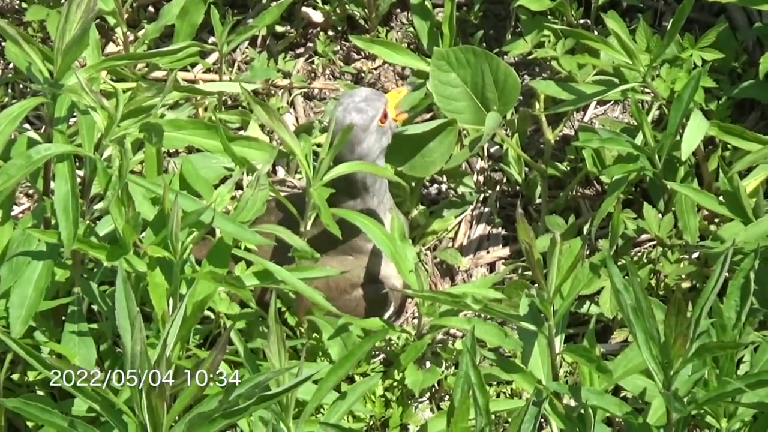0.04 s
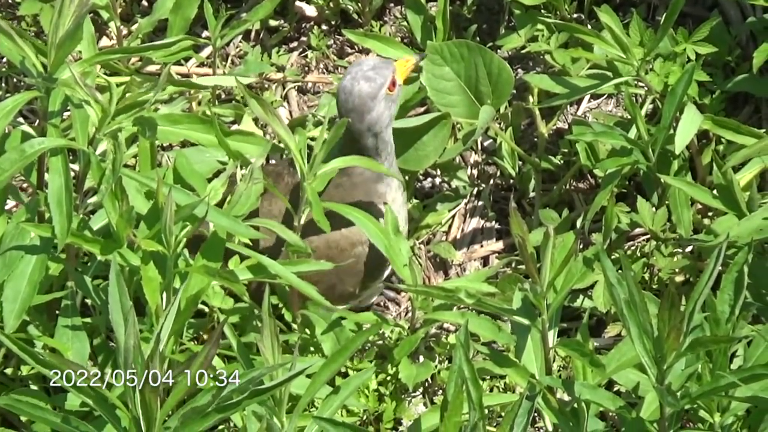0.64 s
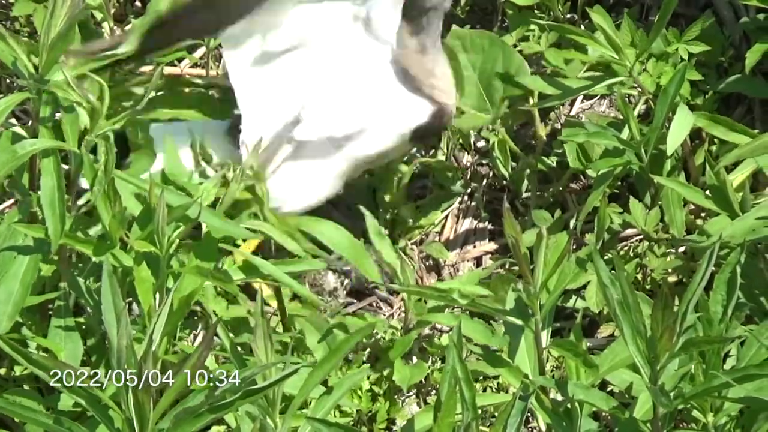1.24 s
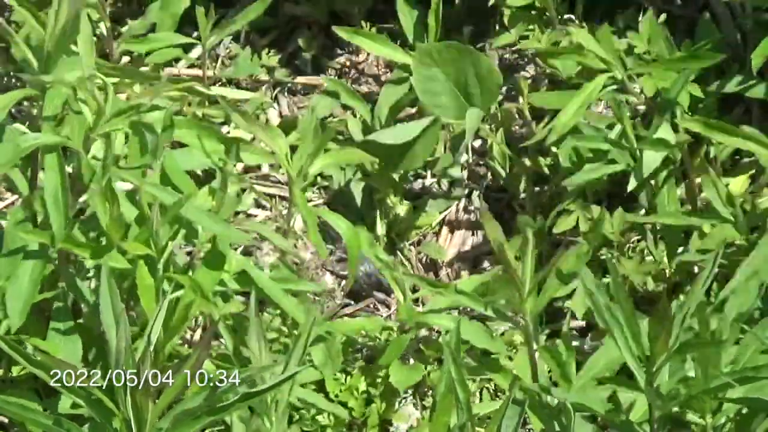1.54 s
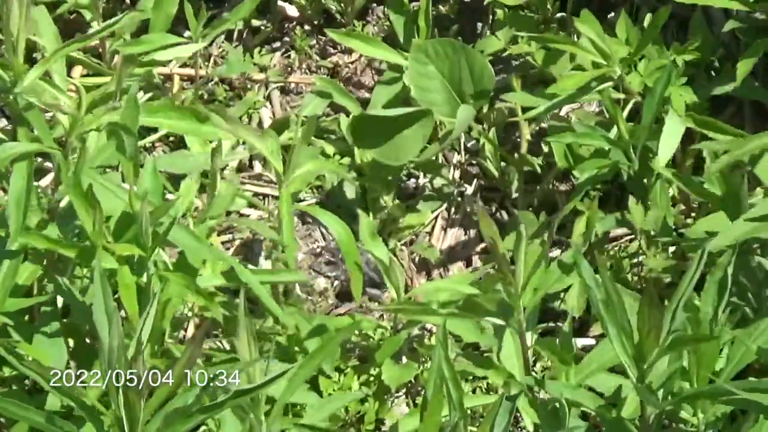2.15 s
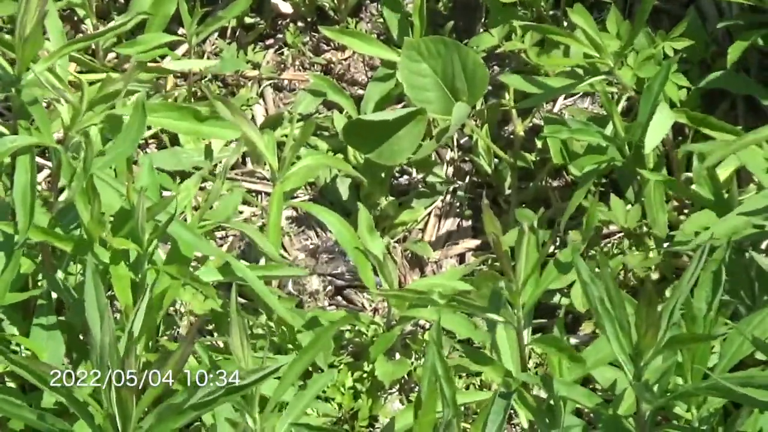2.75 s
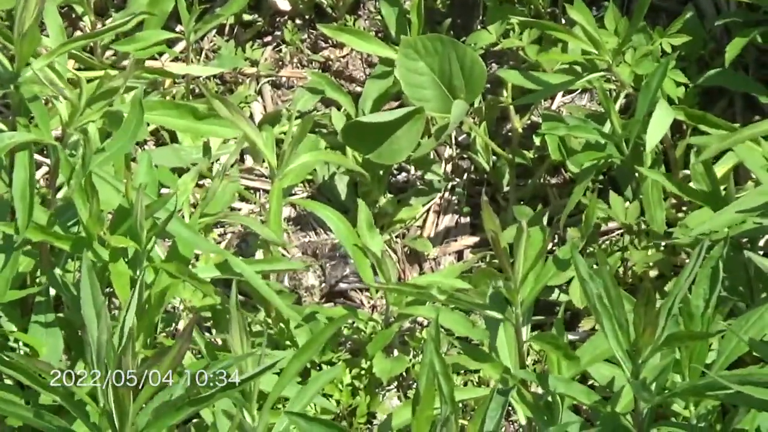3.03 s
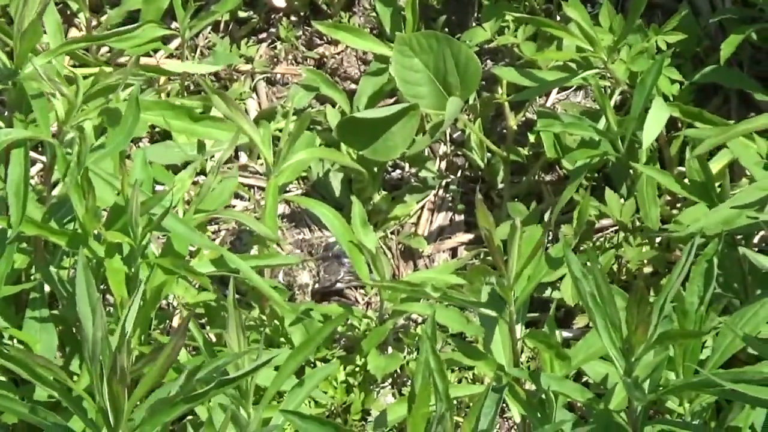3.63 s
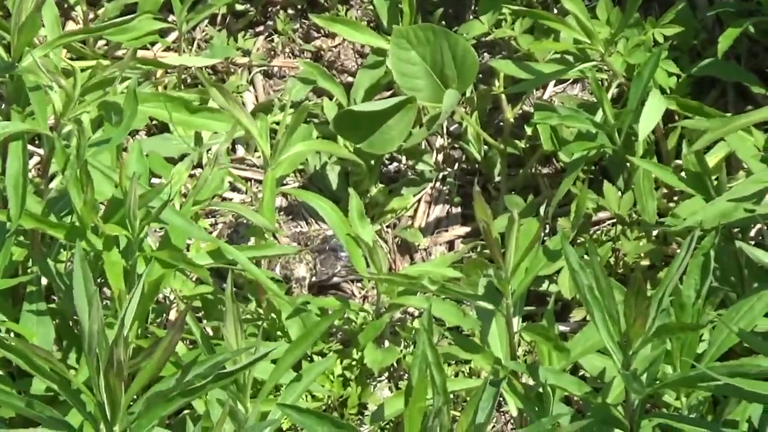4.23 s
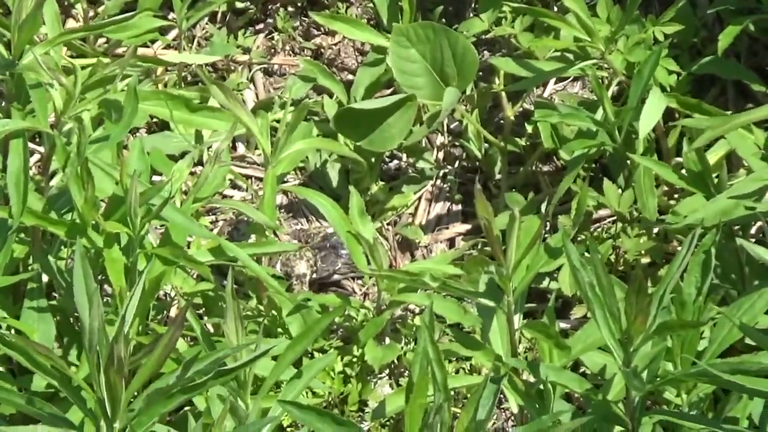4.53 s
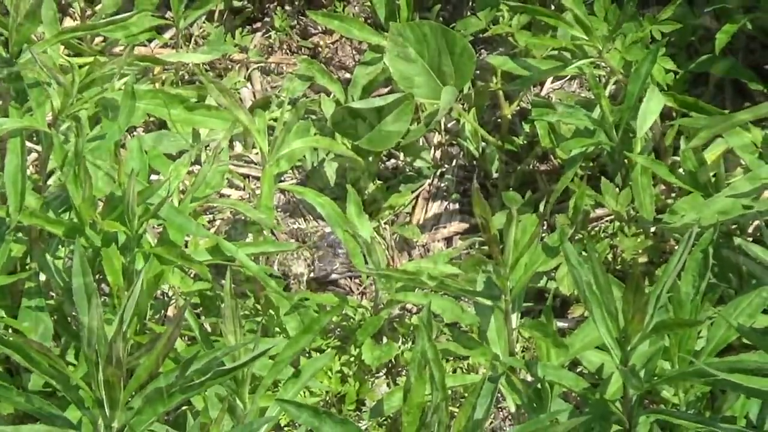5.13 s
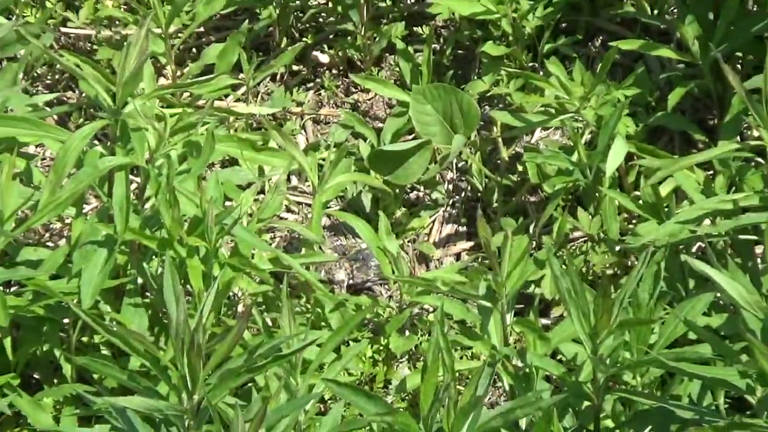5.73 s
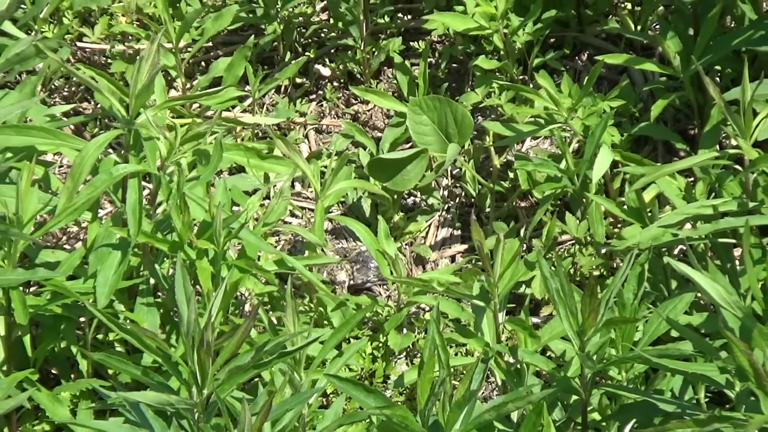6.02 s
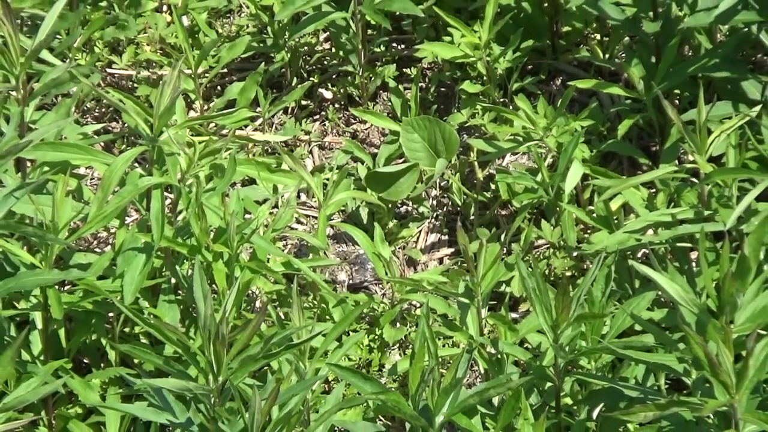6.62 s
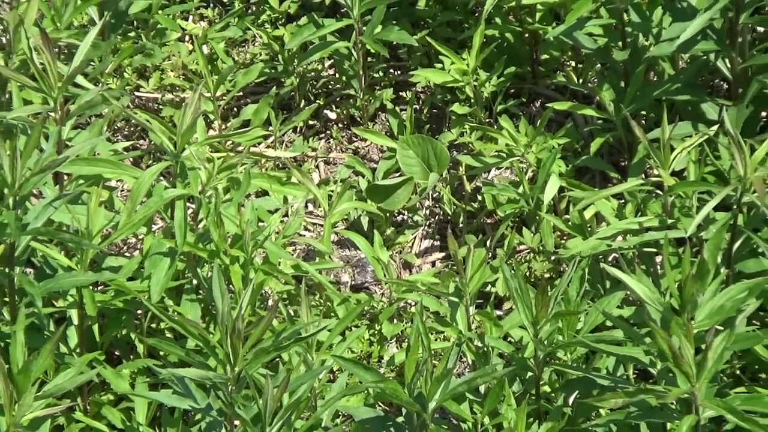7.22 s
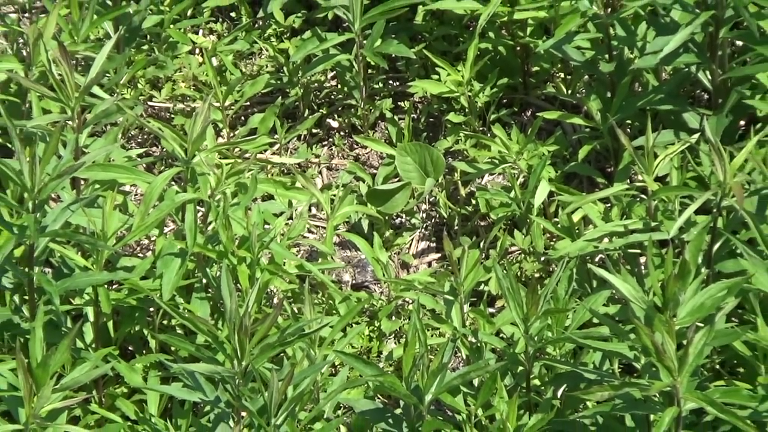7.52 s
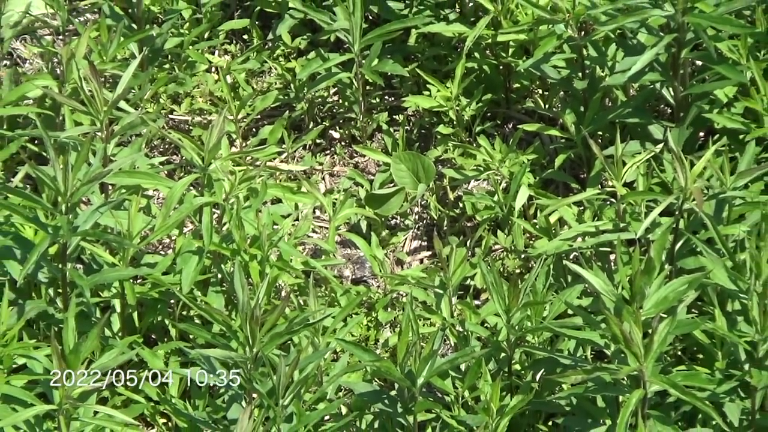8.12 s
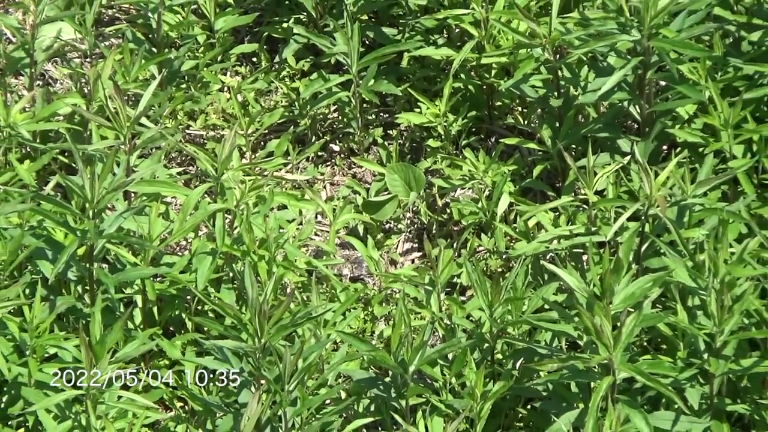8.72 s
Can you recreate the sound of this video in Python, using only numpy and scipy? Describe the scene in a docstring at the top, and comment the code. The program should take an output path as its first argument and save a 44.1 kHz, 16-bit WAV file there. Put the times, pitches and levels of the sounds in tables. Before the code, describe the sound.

A lapwing gives sharp, reedy scolding calls, flies off in a fast fading run, then calls close again over a low outdoor rumble.

```python
"""Sharp, reedy scolds from a lapwing on its nest in the weeds, over a low outdoor rumble. Leaves crackle
as it takes off; it flies away in a fast run of calls that flip between a low and a high register, then
five sharp calls come from close by, with faint chirps of small birds far off. Each note is a pulse train
from the syrinx ringing through windpipe and beak, and the field scatters it back.
A limiter flattens the loudest calls."""
import sys
import numpy as np
from scipy import signal
from scipy.fft import rfft, irfft, next_fast_len
from scipy.io import wavfile
from scipy.ndimage import uniform_filter1d, minimum_filter1d

SR = 44100
rng = np.random.default_rng(int(sys.argv[2]) if len(sys.argv) > 2 else 0)


def master(y):
    """Save y as 16-bit WAV."""
    cut = np.clip(np.atleast_2d(y).T, -1, 1)
    pcm = np.round(cut * 32767)  # scale
    wavfile.write(sys.argv[1], SR, pcm.astype(np.int16))


N = 390726
TIME = np.arange(N) / SR

# the fast run in flight: t/s, length/s, level/dB, opening pitch/Hz, time to the register flip/s (0: none)
FLIGHT_CALLS = [(2.447, .055, -21.5, 1460, 0), (2.541, .077, -24.5, 1620, .025),
                (2.648, .087, -25, 1620, .022), (2.772, .076, -24.5, 1645, .024),
                (2.907, .085, -24.5, 1482, 0), (3.05, .083, -27, 1652, 0), (3.19, .078, -29, 1630, .03),
                (3.318, .07, -29, 1492, .029), (3.448, .069, -29.5, 1505, .024),
                (3.57, .075, -28.5, 1497, 0), (3.702, .075, -30.5, 1503, 0), (3.843, .071, -29.5, 1495, 0),
                (3.978, .07, -32, 1503, .045), (4.117, .085, -36, 1597, 0), (4.25, .095, -37.5, 1630, .046),
                (4.391, .083, -36.5, 1622, 0), (4.527, .072, -37, 1634, 0), (4.654, .074, -35, 1478, 0),
                (4.766, .115, -37, 1620, .048), (4.932, .056, -40, 1470, 0), (4.996, .041, -46, 1530, 0),
                (5.099, .072, -51.5, 1660, .047), (5.26, .043, -63, 1502, 0)]


def from_db(db):
    """Decibels to gain."""
    return 10 ** (np.asarray(db) / 20)


def unit(x):
    """Scales to rms 1."""
    return x / np.sqrt(np.mean(x ** 2) + 1e-20)


def bell(hz, centre_hz, width_hz):
    """A bell curve of height 1."""
    return np.exp(-.5 * ((hz - centre_hz) / width_hz) ** 2)


def over_hz(points, hz):
    """Reads an EQ curve on a log-frequency axis."""
    f, value = np.transpose(points)
    return np.interp(np.log(hz + 1), np.log(f), value)


def over_time(rows, t):
    """Reads every lane of an automation curve at the times t."""
    s, *lanes = np.transpose(rows)
    return [np.interp(t, s, lane) for lane in lanes]


def add(mix, s, sound):
    """Mixes a sound in at s seconds."""
    start = round(s * SR)
    sound = sound[max(-start, 0):]
    part = mix[max(start, 0):][:len(sound)]
    part += sound[:len(part)]


def pan(x, pan_db):
    """Mono to stereo by a level difference, left minus right."""
    return np.array([x * from_db(pan_db / 2), x * from_db(-pan_db / 2)])


def flutter(n, centre_hz, width_hz, size=16384):
    """Random modulation in a band of rates, rms about 1."""
    band = bell(np.fft.rfftfreq(size, 1 / SR), centre_hz, width_hz)
    return unit(irfft(rfft(rng.standard_normal(size)) * band))[:n]


def arch(u, start, middle, end):
    """A parabola through three pitches as u runs from 0 to 1."""
    return np.polyval(np.polyfit([0, .5, 1], [start, middle, end], 2), u)


def scatter(x, delay_s, t60, treble_t60):
    """Sparse echoes of random sign from plants and ground; the treble has its own decay time."""
    t = np.arange(SR) / SR
    taps = rng.choice([-1., 1.], SR) * (rng.random(SR) < 2500 / SR) * (t > delay_s)
    hz, s, spectrum = signal.stft(taps, SR, nperseg=256)
    decay_s = over_hz([(3500, t60), (12000, treble_t60)], hz)[:, None]
    tail = signal.istft(spectrum * from_db(-60 * s / decay_s), SR, nperseg=256)[1]
    return signal.fftconvolve(x, tail / np.linalg.norm(tail))[:N]


def traffic_and_air(level_db=-48.7, patchy_db=1.8):
    """Far traffic and moving air: a rumble and a soft roar that swell together in drifting patches."""
    # tone of the bed: f/Hz, relative level/dB
    bed_eq = [(15, -51), (25, -11), (59, -15), (99, -7), (250, -2.6), (420, -13), (600, -15.5),
              (911, -17.3), (1040, -10), (1290, -14), (1520, -15.5), (2280, -28), (3160, -31),
              (3520, -35.5), (4370, -36), (16000, -42)]
    # its rise and fall: t/s, relative level/dB
    swell = [(0, -1), (.6, -3), (1.2, 0), (2.2, -4), (3.2, 0), (4, 1), (4.7, 5.5), (5.2, 6), (5.45, .5),
             (5.75, 5), (5.95, -1), (6.6, -3), (7.5, -1), (8.86, .5)]
    # how far each band follows the swell: f/Hz, factor
    swell_depth = [(60, .8), (300, 1), (800, 1.15), (2000, 1), (7000, .75)]
    # stereo balance: f/Hz, pan/dB
    balance = [(40, 0), (240, -1.8), (900, -3), (3800, -1.5), (15000, 0)]
    # stereo width: f/Hz, side against mid/dB
    width = [(30, -28), (120, -22), (500, -18), (3000, -18), (8000, -20), (13000, -28)]
    frames, hz = N // 512 + 5, np.fft.rfftfreq(2048, 1 / SR)
    mid_re, mid_im, side_re, side_im, patches = rng.standard_normal((5, frames, len(hz)))
    patches = unit(uniform_filter1d(uniform_filter1d(patches, 12, 0), 10, 1))
    swell_db, = over_time(swell, np.arange(frames) * 512 / SR)
    db = over_hz(bed_eq, hz) + patchy_db * patches
    db += np.outer(swell_db - swell_db.mean(), over_hz(swell_depth, hz))
    mid = pan(mid_re + 1j * mid_im, over_hz(balance, hz))
    side = from_db(over_hz(width, hz)) * (side_re + 1j * side_im)
    spectrum = (mid + np.array([side, -side])) * from_db(db)
    bed = signal.istft(spectrum, nperseg=2048, noverlap=1536, time_axis=1, freq_axis=2)[1]
    return from_db(level_db) * unit(bed[:, :N])


def small_birds():
    """Soft rising whistles far off, with a short echo."""
    # sine glides: t/s, length/s, level/dB, start f/Hz, middle f/Hz, end f/Hz
    chirps = [(6.063, 0.052, -52.5, 1680, 1960, 2130), (6.374, 0.041, -59.5, 2500, 2700, 2720),
              (7.82, 0.1, -77, 3500, 4050, 4250), (8.644, .11, -72.5, 3500, 4040, 4100)]
    out = np.zeros(N)
    for s, length, db, *pitches in chirps:
        u = np.linspace(0, 1, round(length * SR))
        whistle = np.sin(2 * np.pi * np.cumsum(arch(u, *pitches)) / SR)
        add(out, s, from_db(db) * unit(np.sin(np.pi * u) * whistle))
    return pan(out + from_db(-7) * scatter(out, delay_s=.01, t60=.4, treble_t60=.33), -1.5)


def leaves():
    """Wings and feet brush the leaves: bursts of fine, bright crackle."""
    # brushes: t/s, length/s, level before the band-pass/dB
    rustles = [(1.268, 0.14, -56), (1.398, 0.023, -45.5), (1.407, 0.0086, -38), (1.412, 0.052, -44),
               (1.517, .008, -34), (7.62, 0.045, -69)]
    out = np.zeros(N)
    for s, length, db in rustles:
        n = round(length * SR)
        grains = rng.standard_normal(n) * from_db(7 * rng.standard_normal(n))
        add(out, s, from_db(db) * unit(grains * np.hanning(n)))
    bright = signal.butter(1, [3000, 13000], "band", fs=SR, output="sos")
    return pan(signal.sosfilt(bright, out), 0)


def syrinx(cycles, pressure, wander=.41, wander_hz=20, sharpening=.27, harmonics=14):
    """Pulses that sharpen with pressure; the moving head makes every harmonic wander on its own."""
    n, out = len(cycles), 0
    for k in range(1, harmonics + 1):
        path = 1 + wander * (flutter(n, 0, wander_hz) + 1j * flutter(n, 0, wander_hz))
        out = out + pressure ** (sharpening * k) * (path * np.exp(2j * np.pi * k * cycles)).real
    return unit(out)


def throat(x, tilt_db, low_db, peak_hz, peak_db, dip_hz, dip_db, size=8192):
    """Windpipe and open beak ring after every pulse, coloured by the bird's posture."""
    # their resonances: f/Hz, level/dB
    formants = [(600, -53.5), (1200, -18.5), (1600, -15.5), (2400, -13.2), (3000, -3), (3500, -2),
                (4400, -4), (5900, 0.2), (7300, -8), (8500, -9), (9600, -8.5), (11000, -16), (13000, -21),
                (15300, -25.5)]
    hz = abs(np.fft.fftfreq(size, 1 / SR))
    db = over_hz(formants, hz) + tilt_db * np.log2(np.maximum(hz / 3860, 1))  # treble tilt per octave
    db += low_db * bell(hz, 3056, width_hz=247)  # the low resonance
    db += peak_db * bell(hz, peak_hz, width_hz=650) + dip_db * bell(hz, dip_hz, width_hz=650)
    minimum_phase = np.exp(np.conj(signal.hilbert(np.log(from_db(db)))))
    return np.fft.ifft(np.fft.fft(x, size) * minimum_phase).real[:len(x)]


def note(s, length, db, pitches, rough, tilt_db, low_db, attack_s, lead_db, doubling,
         rasp=.19, scoop=.2, lead_s=.011, release_s=.0089, fade_db=11, shimmer_db=4.5):
    """A soft upward yip bursts into an arch of pitch; as the pressure drops it sags, rasps and stops."""
    # the voice when crouched, stretched up, taking off, climbing, flying away, close by, passing:
    # from t/s, closing sag/share of pitch, tilt/dB per octave, peak f/Hz, peak/dB, dip f/Hz, dip/dB
    postures = [(-1, .03, 2.3, 3550, 4, 4800, -6), (.7, .025, .9, 9400, 2, 2200, -3),
                (1.4, .025, 1.9, 9300, 5.5, 2300, -4.5), (2.15, .05, -2.5, 4600, 3, 3000, -9),
                (2.4, .018, -4, 10900, 7, 8770, -4.5), (5.7, .075, 4.3, 4700, 4, 2700, -4),
                (7, .1, 3.3, 7380, 9, 3900, -3.5)]
    sag, posture_tilt_db, *colour = [row[1:] for row in postures if row[0] <= s][-1]
    t = np.arange(-lead_s, length + .003, 1 / SR)
    n, u = len(t), np.clip(t / length, 0, 1)
    opening, closing = np.exp(-(t - t[0]) / (lead_s / 2)), u ** 6
    rough = rough + .5 * closing + .6 * opening
    hz = arch(u, *pitches) * (1 - sag * u ** 3.5 - scoop * np.clip(-t / lead_s, 0, 1))
    hz *= 1 + .029 * rough * flutter(n, 250, 200) + .0055 * flutter(n, 40, 50)  # jitter and waver
    cycles = np.cumsum(hz) / SR
    burst = np.clip(t / attack_s + .5, 0, 1)
    lead_in = from_db(lead_db) * np.clip(2 * (t - t[0]) / lead_s, 0, 1)
    release = np.clip((t[-1] - t) / release_s, 0, 1)
    pressure = np.sin(np.pi / 2 * np.maximum(burst, lead_in) * release)
    puffs = unit(np.exp(-(cycles % 1) / .5) * rng.standard_normal(n))  # air escapes once a cycle
    drive = (syrinx(cycles, .5 + pressure / 2) + rasp * rough * puffs) * pressure
    drive *= 1 + doubling * np.sin(np.pi * u) ** 2 * np.cos(np.pi * cycles)  # pulses go strong, weak
    gain = from_db(db + shimmer_db * rough * flutter(n, 110, 110) - fade_db * u ** 4)
    return s + t[0], gain * unit(throat(drive, posture_tilt_db + tilt_db, low_db, *colour))


def scold(s, length, db, hz, strain):
    """A single call: strain roughens it, deepens its arch of pitch and brings out the low resonance."""
    depth = min(.002 + .16 * strain, .06)  # share of the top pitch
    pitches = (hz * (1 - depth), hz, hz * (1 - 1.05 * depth))
    return note(s, length, db, pitches, rough=strain, tilt_db=0, low_db=min(-15 + 62 * strain, 12),
                attack_s=.0058, lead_db=-35, doubling=.025)


def flight_call(s, length, db, hz, flip_s, overlap_s=.018, flip_db=-2.3, flip_fall=.018):
    """One arched note, or a rising note that breaks into a softer, falling one in the other register."""
    # the two registers: usual pitch/Hz, arch/share of pitch, roughness/0-1, tilt/dB per octave,
    # low resonance/dB, attack/s, lead-in/dB
    low = (1474, .02, .36, -.7, -12, .003, -32)
    high = (1620, .046, .37, -2, 1.8, .011, -14)
    first, second = (high, low) if hz > (low[0] + high[0]) / 2 else (low, high)
    foot_hz, flip_hz = hz * (1 - first[1]), second[0]
    dull_db = .8 * (s - FLIGHT_CALLS[0][0])  # the treble fades as the bird recedes
    parts = [(s, length, db, (foot_hz, hz, foot_hz), first)]
    if flip_s > 0:
        falling = (flip_hz, flip_hz, flip_hz * (1 - flip_fall))
        parts = [(s, flip_s + overlap_s, db, (foot_hz, hz, hz), first),
                 (s + flip_s, length - flip_s, db + flip_db, falling, second)]
    return [note(*shape, rough, tilt_db - dull_db, low_db, attack_s, lead_db, doubling=.13)
            for *shape, (_, _, rough, tilt_db, low_db, attack_s, lead_db) in parts]


def lapwing(weeds_db=-14.5, near_db=1.0, far_db=-8, side_db=-19, side_hz=9500):
    """All calls, blurred by the weeds, with more of the field's echo the farther the bird flies."""
    # calls from the nest, at take-off and close by: t/s, length/s, level/dB, top pitch/Hz, strain/0-1
    scolds = [(-.012, .057, -17.5, 1228, .32), (.091, .046, -19, 1234, .35), (.22, .059, -19.5, 1208, .33),
              (.788, .052, -17.5, 1179, .07), (.869, .054, -21.5, 1262, .52), (.963, .066, -19, 1190, .08),
              (1.137, .033, -23, 1204, .2), (1.434, .057, -18, 1228, .07), (1.528, .098, -19, 1258, .1),
              (1.688, .068, -18.5, 1308, .38), (1.818, .057, -18.5, 1331, .33),
              (1.927, .065, -18.5, 1335, .28), (2.05, .067, -19, 1368, .19), (2.183, .06, -23, 1528, .36),
              (5.8, .082, -20.5, 1176, .2), (6.186, .054, -22.5, 1168, .17), (6.471, .052, -23, 1172, .15),
              (6.726, .046, -23, 1157, .17), (7.034, .049, -24, 1160, .13)]
    # where the bird is: t/s, echo send against direct/dB, pan/dB
    flight_path = [(0, -19, -.4), (1.5, -17, -.4), (2.2, -10, -1.2), (3.2, -4.5, -3.1), (4.2, 2, -2.4),
                   (5, -3.5, -2.2), (5.75, -17, .4), (7.1, -15, .8)]
    voice = np.zeros(N)
    for row in scolds:
        add(voice, *scold(*row))
    for row in FLIGHT_CALLS:
        for part in flight_call(*row):
            add(voice, *part)
    send_db, pan_db = over_time(flight_path, TIME)
    send = from_db(send_db)
    direct = voice / np.sqrt(1 + send ** 2)
    weeds = from_db(weeds_db) * scatter(direct, delay_s=.002, t60=.12, treble_t60=.16)
    near = from_db(near_db) * scatter(direct * send, delay_s=.004, t60=.22, treble_t60=.27)
    far = from_db(far_db) * scatter(direct * send, delay_s=.023, t60=.8, treble_t60=.36)
    mid = direct + weeds + near + far
    # the calls sit slightly off centre and a little wide; above about 9.5 kHz the sound fades to mono
    left, right = pan(mid, pan_db)
    quadrature = signal.hilbert(mid, next_fast_len(N)).imag[:N]
    side = (left - right) / 2 + from_db(side_db) * quadrature
    side = signal.sosfiltfilt(signal.butter(2, side_hz, fs=SR, output="sos"), side)
    return np.array([mid + side, mid - side])


def scene():
    """The lapwing in front of small birds, leaves and the outdoor bed."""
    return lapwing() + small_birds() + leaves() + traffic_and_air()


def record(dry, limit_db=-11.5, recovery_db_per_s=170, cutoff_hz=15800):
    """A fast peak limiter flattens the near calls and ducks the bed; a steep low-pass follows."""
    peak_db = 20 * np.log10(1e-6 - minimum_filter1d(-abs(dry).max(0), size=100))
    fall_db = TIME * recovery_db_per_s
    held_db = np.maximum.accumulate(peak_db + fall_db) - fall_db
    over_db = np.maximum(held_db - limit_db, 0)
    ducked = dry * from_db(-.85 * uniform_filter1d(over_db, size=80))
    low_pass = signal.firwin(401, cutoff_hz, window=("kaiser", 8), fs=SR)
    return signal.oaconvolve(ducked, low_pass[None], "same")


dry = scene()
out = record(dry)
master(out)
```